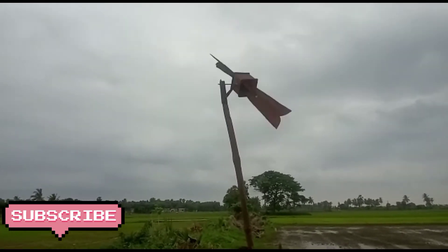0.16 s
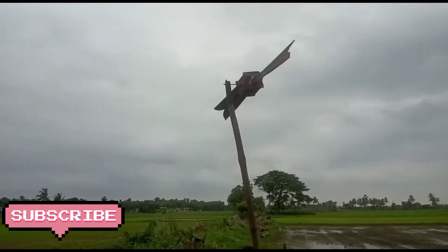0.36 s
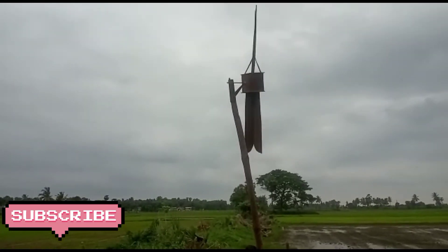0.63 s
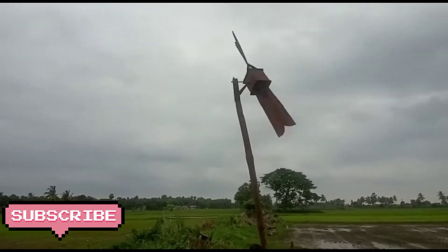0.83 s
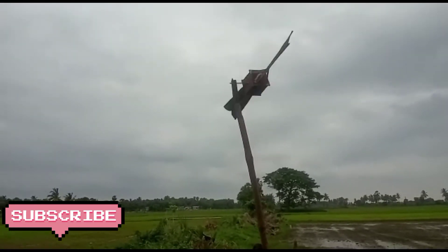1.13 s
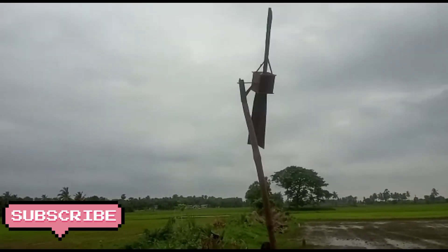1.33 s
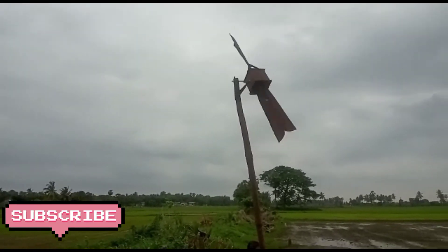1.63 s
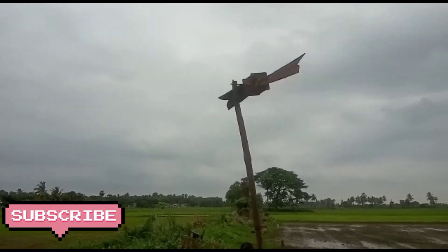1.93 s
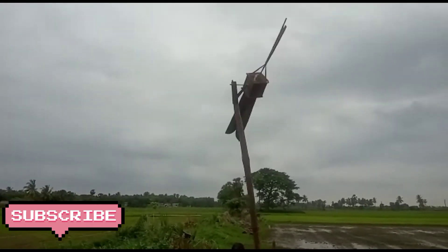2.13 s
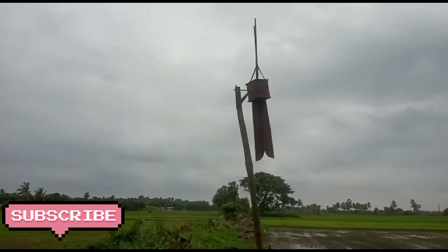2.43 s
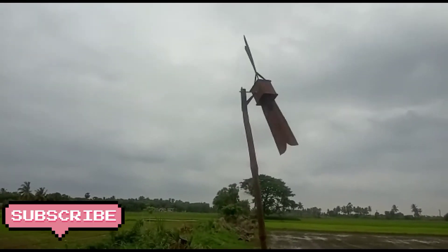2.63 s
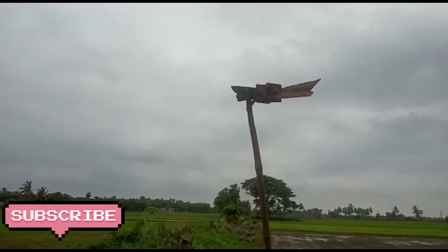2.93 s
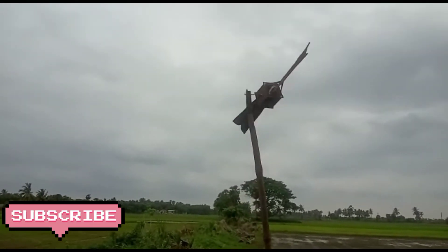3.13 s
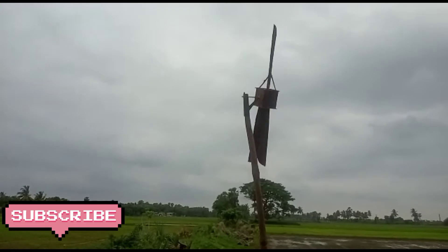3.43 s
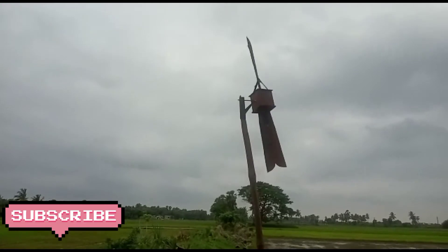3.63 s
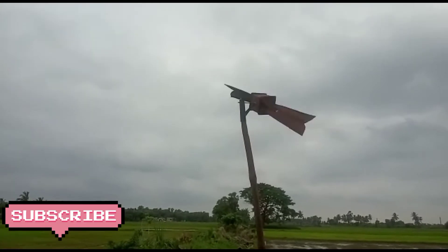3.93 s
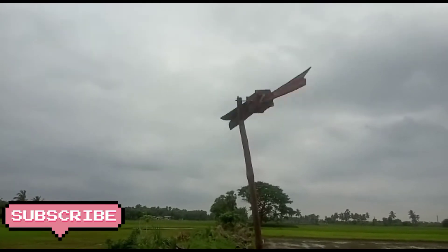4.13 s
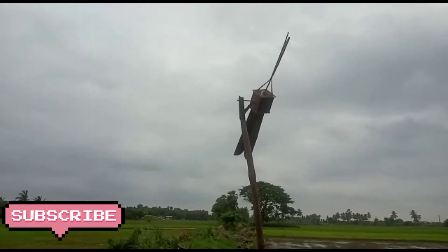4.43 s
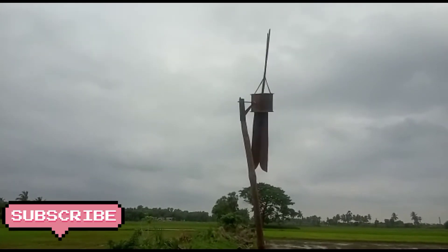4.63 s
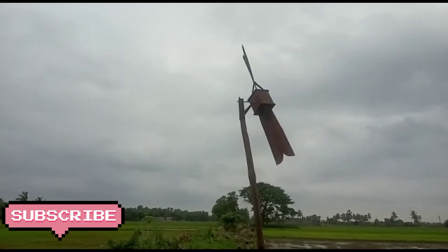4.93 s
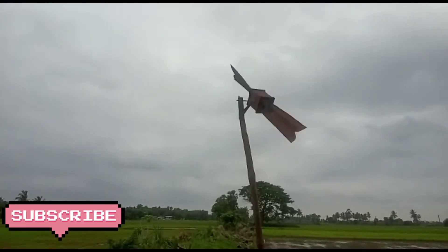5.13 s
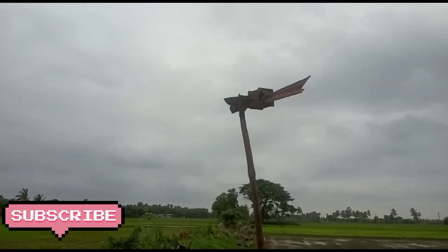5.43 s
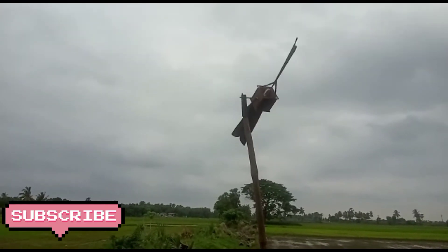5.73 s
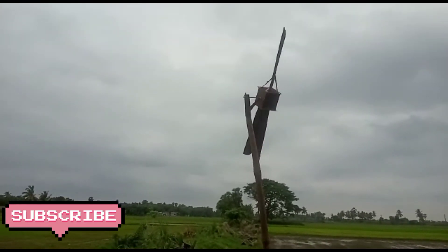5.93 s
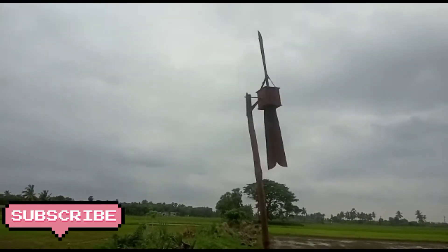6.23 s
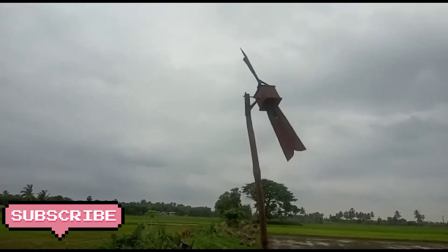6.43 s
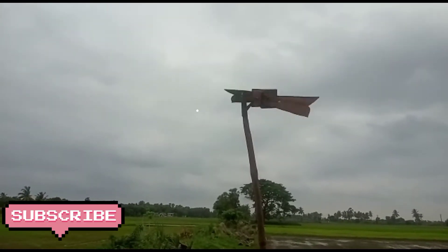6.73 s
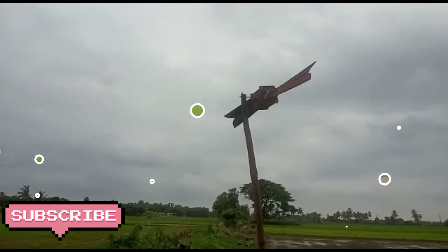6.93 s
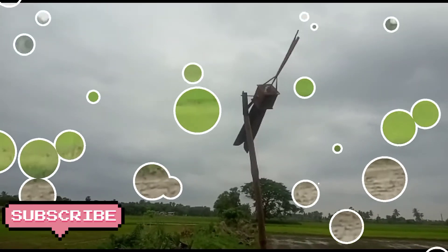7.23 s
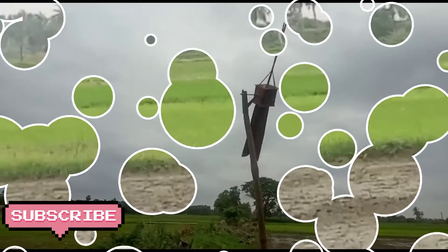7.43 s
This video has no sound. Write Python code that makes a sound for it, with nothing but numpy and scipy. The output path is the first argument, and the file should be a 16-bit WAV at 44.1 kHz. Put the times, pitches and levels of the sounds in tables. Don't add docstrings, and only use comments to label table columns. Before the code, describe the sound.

Pebbles tumble and clatter inside a wind-turned tin can rattle over an open field, with low wind buffeting and faint insects behind.

```python
import sys
import numpy as np
from scipy import signal
from scipy.fft import rfft, irfft, next_fast_len
from scipy.io import wavfile
from scipy.ndimage import uniform_filter1d, map_coordinates

SR = 44100
rng = np.random.default_rng(int(sys.argv[2]) if len(sys.argv) > 2 else 0)


def bounce(signal):
    frames = np.transpose(np.atleast_2d(signal))
    limited = np.clip(frames, -1, 1)
    pcm = np.round(limited * 32767).astype(np.int16)
    wavfile.write(sys.argv[1], SR, pcm)


def gain_from_decibels(decibels):
    exponent = np.asarray(decibels, float) / 20
    return 10 ** exponent


N = 333837
TIME = np.arange(N) / SR


def unit(x):
    return x / np.sqrt(np.mean(x ** 2) + 1e-20)


def along(points, hz):
    point_hz, value = np.transpose(points)
    return np.interp(np.log(hz + 1), np.log(point_hz + 1), value)


def wobble(rate):
    return map_coordinates(rng.standard_normal(int(N * rate / SR) + 4), [TIME * rate])


def noise(spectrum):
    m = next_fast_len(N)
    hz = np.fft.rfftfreq(m, 1 / SR)
    white = rfft(rng.standard_normal(m))
    return unit(irfft(white * gain_from_decibels(along(spectrum, hz)), m)[:N])


def window(start, end, edge):
    return np.clip(np.minimum(TIME - start, end - TIME) / edge, 0, 1)


def rattle():
    places = 12
    rings = can_rings(places, size=1100)
    m = next_fast_len(N + SR // 2)
    spectrum = 0
    for force, ring in zip(pebbles(places), rings):
        spectrum = spectrum + (rfft(force, m) * rfft(ring, m)).sum(axis=0)
    return irfft(spectrum, m)[:N]


# hit_s, peak_db, wall_db
BOTTOM_BLOWS = [(0.13, -29.5, 2), (0.2002, -24.5, -13), (0.3684, -32, -18), (0.7257, -23.5, 7),
                (0.8592, -24, 7.5), (0.9035, -26, -3), (1.0019, -26, 1.5), (1.1434, -29, -24),
                (1.2218, -27.5, -8), (1.7465, -25, -2), (1.8831, -21.5, -33), (2.2833, -34, -5),
                (2.5282, -31, 5), (2.8842, -28.5, -2.5), (2.9363, -23.5, -28), (3.0075, -32.5, -3),
                (3.2998, -33.5, -4), (3.3611, -29.5, -2), (3.416, -28.5, 9.5), (4.395, -35.5, 2),
                (4.6246, -33.5, 6), (5.2272, -22, 2), (5.3242, -33, -19), (5.8368, -33.5, 4),
                (5.885, -31, 0), (6.012, -36, 13), (6.6734, -27.5, -22), (6.834, -30, -4.5),
                (7.2367, -37, -5), (7.4314, -38.5, 5.5)]
# hit_s, peak_db, wall_db
SIDE_BLOWS = [(0.0976, -28, 4.5), (0.2341, -24, -22), (0.3136, -21, -27), (0.403, -25.5, -26),
              (0.4921, -27.5, -25), (0.6466, -25, 8.5), (0.9193, -26.5, -3), (1.027, -22.5, -8),
              (1.3725, -24.5, -2), (1.4566, -22.5, 1.5), (1.7731, -27, 5.5), (1.8326, -21, -9),
              (2.2132, -32.5, -7), (2.362, -22, 5), (2.396, -25, 5), (2.4446, -41, 14.5),
              (2.7868, -30, 6.5), (3.0956, -28.5, -9), (3.4539, -23, 7.5), (3.5922, -29.5, 4),
              (3.718, -34, 9), (3.8098, -29, 5.5), (4.0011, -19, -12), (4.4245, -25.5, -1.5),
              (4.5065, -28.5, -18), (4.551, -23, -1), (5.9249, -24.5, 5), (6.5999, -23.5, -1),
              (6.962, -38.5, 2.5), (7.3154, -37, 4)]
# hit_s, peak_db, wall_db
RIM_TICKS = [(0.61, -29.5, 0), (1.6815, -29.5, 2.5), (1.7185, -31.5, -1), (1.8144, -25.5, -10),
             (2.0185, -33.5, -25), (2.0762, -33, -5), (2.1582, -29, -3), (2.578, -36, 2),
             (2.6566, -36, 7.5), (2.7231, -27, 2.5), (3.251, -37, -2), (3.5573, -30.5, 6),
             (3.6644, -30.5, 8), (3.8634, -27, -5), (3.9291, -33, -3), (4.2987, -28, -9.5),
             (4.7734, -48, 0), (4.841, -41.5, -6), (5.0178, -38.5, -23), (5.1241, -31, -4),
             (5.1924, -21.5, -9), (5.6646, -59, -36), (5.795, -40, 6.5), (6.1653, -34.5, -2.5),
             (6.4035, -38.5, -1), (6.4624, -31, 4), (6.4985, -25, 1), (6.548, -33, 9), (7.0438, -43.5, -1),
             (7.1648, -42, -12)]
# hit_s, peak_db, wall_db
LIGHT_BLOWS = [(0.0593, -31.5, 11), (0.1096, -25, -14), (0.1663, -28.5, -2), (0.2782, -27.5, -10),
               (0.4425, -31, -19), (0.6639, -31.5, 7), (0.707, -35, 13.5), (0.7821, -34, 5),
               (0.846, -30, -19), (0.983, -25.5, 0.5), (1.4013, -27, 4), (1.4311, -30.5, 1),
               (1.4892, -26.5, 3), (1.5568, -39, 5), (1.8664, -22.5, -25), (2.3067, -39, 5),
               (2.478, -37.5, 8), (2.8683, -27.5, -3), (3.0622, -31, -3), (3.4406, -23.5, -11),
               (3.7885, -38, 7), (4.088, -30.5, -24), (4.6564, -31.5, 4), (5.1022, -40, -5),
               (5.5706, -54.5, -4), (5.9488, -25.5, 8.5), (5.978, -31, -1), (6.1181, -33.5, 4),
               (6.383, -51, -14), (6.7373, -36, -20)]
# start_s, end_s
STILL_SPANS = [(1.64, 1.68), (2.63, 2.655), (3.195, 3.246), (3.625, 3.662), (4.265, 4.295), (4.8, 4.836),
               (4.925, 5.016), (5.69, 5.76), (6.29, 6.375), (6.435, 6.459), (6.81, 6.83)]


def pebbles(count):
    force = np.zeros((4, count, N + SR))
    kinds = [(BOTTOM_BLOWS, -15.5), (SIDE_BLOWS, -26.5), (RIM_TICKS, -64), (LIGHT_BLOWS, -24.5)]
    for blows, belly_db in kinds:
        for hit_s, peak_db, wall_db in blows:
            delay_s = np.append(0, np.cumsum(.001 + rng.exponential(0.0033, size=4)))
            rebound_db = np.append(0, rng.normal(-5, 3, size=4))
            size = gain_from_decibels(peak_db + 19 - 400 * delay_s + rebound_db)
            edge_db = -16 + 0.11 * (peak_db + 29) + rng.normal(0, 3.2)
            colour = gain_from_decibels([belly_db + 5.5, wall_db - 7.0, 0, edge_db])
            hit = ((hit_s + delay_s) * SR).astype(int)
            force[:, rng.integers(count), hit] += np.outer(colour, size)

    body_db, belly_db, wall_db = heap()
    edge_db = body_db - 13 + 0.44 * (body_db + 26.0)
    rate = np.clip(400 * gain_from_decibels(.6 * (body_db + 40)), 220, 450)
    touch = ((rng.random(N) < rate / SR) | (TIME == 0)) / np.sqrt(rate)
    uneven = np.clip((body_db + 62) / 20, .25, 1)
    contact_db = np.minimum(5 * rng.exponential(size=N), 13)
    rain = touch * gain_from_decibels(uneven * contact_db + 2 * wobble(30))
    rain = unit(rain * gain_from_decibels(4.0 * (1 - uneven)))
    bands = gain_from_decibels([belly_db - 2.0, wall_db - 0.5, body_db - 2.5, edge_db])
    place = (TIME * 14 + 2 * rng.random(N)).astype(int) % count
    force[:, place, np.arange(N)] += bands * rain
    still = sum(window(start, end, edge=0.0089) for start, end in STILL_SPANS)
    return force[..., :N] * gain_from_decibels(-19 * still)


# crash_s, level_db, build_up_db_per_s, settling_db_per_s, belly_db
HEAP_SLIDES = [(0.02, -31, 60, 48, -13.5), (0.36, -36, 62, 124, -12.5), (0.67, -35.5, 46, 24, -12.5),
               (1.06, -32.5, 83, 116, -15), (1.47, -32, 81, 117.5, -21.5), (1.882, -33.5, 63.5, 96, -14),
               (2.37, -34, 72, 143, -14), (2.94, -34, 63, 125, -19), (3.471, -33, 85.5, 117, -15.5),
               (4.02, -34, 53, 70.5, -16), (4.57, -31, 110, 107.5, -22.5), (5.25, -28, 131, 166, -14),
               (6.01, -34, 68, 110, -13), (6.62, -30, 122, 68, -20.5), (7.301, -43.5, 37, 46, -14.5)]
# time_s, level_db
ROLLING = [(0, -50), (1.3, -48), (1.65, -53.5), (2.8, -43), (3.3, -53.5), (3.9, -47), (4.8, -55),
           (5.4, -56), (5.75, -70), (6.3, -51.5), (7.05, -74), (7.57, -54.5)]


def heap():
    hold_s = 0.014
    belly_rise, belly_fall = 2.3, 1.22
    t = TIME[::100]
    roll_db = np.interp(t, *np.transpose(ROLLING))
    crash_s, level_db, rise_db, fall_db, belly_db = np.transpose(HEAP_SLIDES)[..., None]
    early_db = abs(rise_db) * np.maximum(crash_s - hold_s - t, 0)
    late_db = abs(fall_db) * np.maximum(t - crash_s - hold_s, 0)

    def summed(levels_db):
        return np.interp(TIME, t, 10 * np.log10(np.sum(gain_from_decibels(levels_db) ** 2, axis=0)))

    body_db = summed([roll_db, *(level_db - early_db - late_db)])
    drum_db = level_db + belly_db - belly_rise * early_db - belly_fall * late_db
    drum_db = summed([roll_db - 47, *drum_db])
    wall_db = body_db - 12 + 0.23 * (body_db + 36.5) + 2 * wobble(3.8)
    return body_db, drum_db, wall_db


# mode_hz, level_db
SHEET_MODES = [(180, -53), (300, 17), (425, -45), (510, 6), (563, -15), (747, -13.5), (1090, 3),
               (1660, -0.5), (1920, 5), (2860, 0.5), (3990, 8), (5650, 3), (6560, 10.5), (15800, 9)]
# mode_hz, t60_s
RING_TIMES = [(400, .16), (1300, .2), (3500, .14), (9000, .07), (15000, .04)]
# mode_hz, width_hz, level_db
SHELL_MODES = [(430, 24, -11), (589.5, 27, -10), (1040.6, 43.5, -7), (2020, 95, -5.5), (2635, 35, -2.5)]
BAND_BORDERS = [330, 850, 1800, 7400, 15900]


def can_rings(count, size):
    t = np.arange(SR // 3) / SR
    sheet_hz = 330 + 15500 * ((np.arange(size) + rng.random(size)) / size) ** .85
    shell_hz, width_hz, shell_db = np.repeat(SHELL_MODES, 3, axis=0).T
    hz = np.append(sheet_hz, shell_hz + width_hz * np.tile([-.6, 0, .6], len(SHELL_MODES)))
    level_db = np.append(along(SHEET_MODES, sheet_hz), shell_db + 6.5)
    t60_s = along(RING_TIMES, hz) * np.exp(.25 * rng.standard_normal(len(hz)))
    modes = np.sin(2 * np.pi * np.outer(hz, t)) * gain_from_decibels(-60 * t / t60_s[:, None])

    region_db = 10 * uniform_filter1d(rng.standard_normal((count, len(hz))), size=40)
    place_db = level_db + region_db + rng.normal(0, 2.34, (count, len(hz)))
    shape = rng.standard_normal((count, len(hz))) * gain_from_decibels(place_db)
    whole = shape @ modes * (1 - np.exp(-t / 0.0011))
    thin = signal.butter(2, 900, "high", fs=SR, output="sos")
    crack = signal.sosfilt(thin, rng.standard_normal(whole.shape))
    whole += 1.3 * whole[:, :200].std() * gain_from_decibels(-60 * t / 0.0008) * crack
    whole *= 1 + 1.2 * gain_from_decibels(-60 * t / .03)

    rings = []
    for edges in zip(BAND_BORDERS, BAND_BORDERS[1:]):
        band = signal.butter(4, edges, "band", fs=SR, output="sos")
        rings.append(signal.sosfilt(band, whole))
    rings = np.array(rings)
    rings[0] = signal.lfilter(*signal.iirnotch(505, 6, fs=SR), rings[0])
    return rings / np.linalg.norm(rings, axis=2, keepdims=True)


# start_s, length_s, buffet_db, flutter_db
PORT_GUSTS = [(0.506, 0.032, -55, -66), (0.576, 0.24, -56, -68), (0.859, 0.17, -56, -64),
              (1.244, 0.038, -58, -70), (1.394, 0.064, -53, -62), (1.54, 0.078, -57, -68.5),
              (1.733, 0.36, -53, -61.5), (2.153, 0.16, -56, -55.5), (2.34, 0.074, -55, -82),
              (2.487, 0.11, -53, -62), (2.74, 0.21, -53.5, -96), (3.016, 0.15, -52, -83),
              (3.255, 0.13, -48.5, -68), (3.482, 0.076, -60, -65), (3.706, 0.33, -54.5, -91),
              (4.142, 0.057, -61, -85), (4.259, 0.045, -52, -81), (4.325, 0.27, -53.5, -91),
              (4.73, 0.04, -48, -85), (4.859, 0.23, -52, -89), (5.357, 0.076, -56, -81),
              (5.879, 0.081, -50, -63), (6.078, 0.1, -50.5, -65.5), (6.262, 0.47, -49.5, -61.5),
              (6.818, 0.2, -54.5, -79), (7.061, 0.1, -53, -79), (7.215, 0.166, -52, -61.5),
              (7.41, 0.069, -54.5, -67), (7.526, 0.051, -55, -66)]
# time_s, level_db
LULL_WIND = [(0, -68.5), (1.3, -68.5), (2, -57), (5, -68.5), (5.7, -72.5), (6.1, -68), (7.57, -62)]
# pitch_hz, level_db
BUFFET_COLOUR = [(20, -45), (45, -17), (95, 4), (140, -7.5), (220, -32), (400, -87)]
# pitch_hz, level_db
FLUTTER_COLOUR = [(100, -22), (160, 6.5), (250, -0.5), (350, -6.5), (600, -102)]


def wind():
    edge_s = 0.016
    lull_db = np.interp(TIME, *np.transpose(LULL_WIND))
    gusts = np.array([window(start - edge_s, start + length + edge_s, edge_s) ** 2
                      for start, length, *_ in PORT_GUSTS])
    _, _, buffet_db, flutter_db = np.transpose(PORT_GUSTS)
    strength = gain_from_decibels(lull_db) + gain_from_decibels(buffet_db) @ gusts
    sharpness = gain_from_decibels(lull_db - 14) + gain_from_decibels(flutter_db) @ gusts
    lumps = gain_from_decibels(4.8 * wobble(11))
    buffet = strength * unit(lumps * noise(BUFFET_COLOUR))
    flutter = sharpness * unit(lumps * gain_from_decibels(4 * wobble(20)) * noise(FLUTTER_COLOUR))
    return buffet + flutter


# start_s, end_s, level_db
CRICKET_PHRASES = [
    (3.115, 3.31, -63),
    (3.62, 3.9, -63),
    (4.155, 4.43, -61),
    (4.755, 5.14, -60),
]


def bush_cricket():
    stroke = np.cumsum(140 + 3.7 * wobble(4.8)) / SR % 1
    glide_hz = 10000 - 950 * stroke + 150 * wobble(400)
    tone = np.sin(2 * np.pi * np.cumsum(glide_hz) / SR)
    wing = unit(np.sin(np.pi * stroke) ** 2 * gain_from_decibels(4.4 * wobble(220)) * tone)
    phrases = np.zeros(N)
    for start, end, level_db in CRICKET_PHRASES:
        chirp = np.clip(6 * np.sin(np.pi * (TIME - start) * 10.3) ** 2, .05, 1)
        phrases += gain_from_decibels(level_db) * window(start, end, 0.035) * chirp
    return phrases * wing


# start_s, end_s, pitch_hz, level_db
WHISTLE_NOTES = [
    (3.58, 3.67, 4540, -57),
    (4.965, 5.02, 4020, -62),
    (6.2, 6.41, 4525, -62),
    (6.35, 6.44, 800, -64),
    (4.63, 4.82, 670, -62),
    (5.52, 5.61, 1510, -69),
]


def whistles():
    drift = np.cumsum(15 * wobble(100)) / SR
    total = np.zeros(N)
    for start, end, pitch_hz, level_db in WHISTLE_NOTES:
        tone = np.sin(2 * np.pi * (pitch_hz * TIME + drift))
        total += gain_from_decibels(level_db + 2.2 * wobble(48)) * window(start, end, 0.014) * tone
    return total


def far_chorus():
    band = noise([(8500, -40), (8900, -5), (9300, 0), (9650, -5), (9950, -45)])
    level_db = -68.5 - 8 * np.clip(TIME - 6.5, 0, 1) + wobble(3) + 2 * wobble(130)
    return gain_from_decibels(level_db) * band


# pitch_hz, level_db
FIELD_COLOUR = [(250, -1), (1300, -25), (2200, 13), (4000, -48), (8300, -34), (10200, -41), (15500, -56)]


def field_hiss():
    return gain_from_decibels(-80 + 3 * wobble(4) + 2 * wobble(25)) * noise(FIELD_COLOUR)


def scene():
    near = rattle() + wind() + bush_cricket() + whistles()
    return (near + far_chorus() + field_hiss())[None]


def roll_off(x):
    return signal.sosfilt(signal.butter(12, 16370, fs=SR, output="sos"), x)


def record(dry):
    dip_hz, dip_width_hz, dip_share = 8200, 2970, 0.49
    dip = signal.iirpeak(dip_hz, dip_hz / dip_width_hz, fs=SR)
    dry = dry - dip_share * signal.lfilter(*dip, dry)
    band_limit = signal.ellip(10, .5, 70, 15600, fs=SR, output="sos")
    mix = signal.sosfilt(band_limit, dry)
    return roll_off(mix)


dry = scene()
out = record(dry)
bounce(out)
```